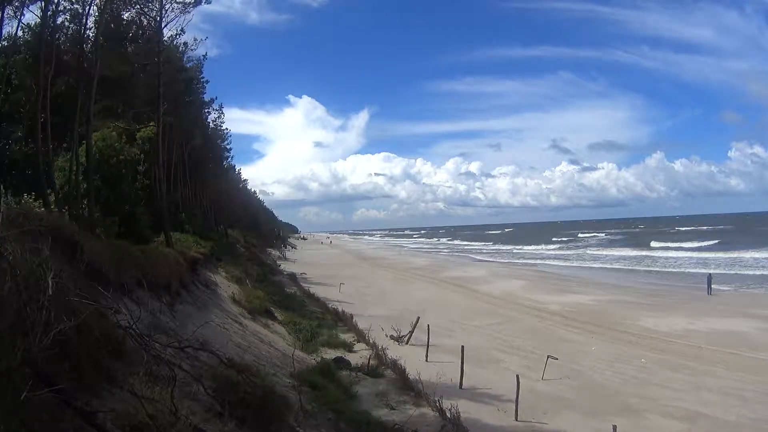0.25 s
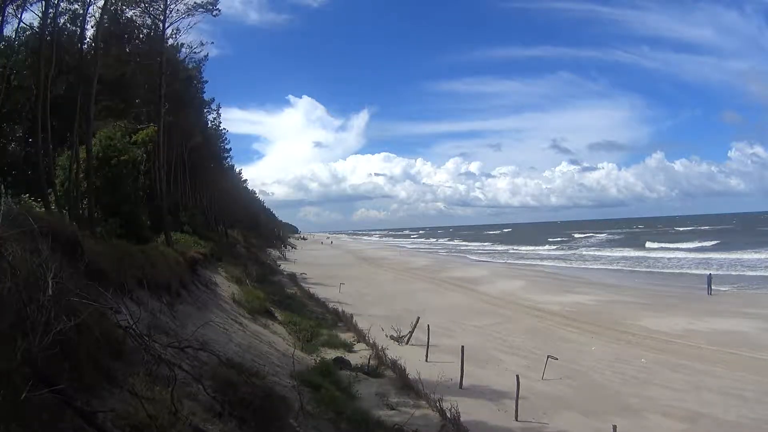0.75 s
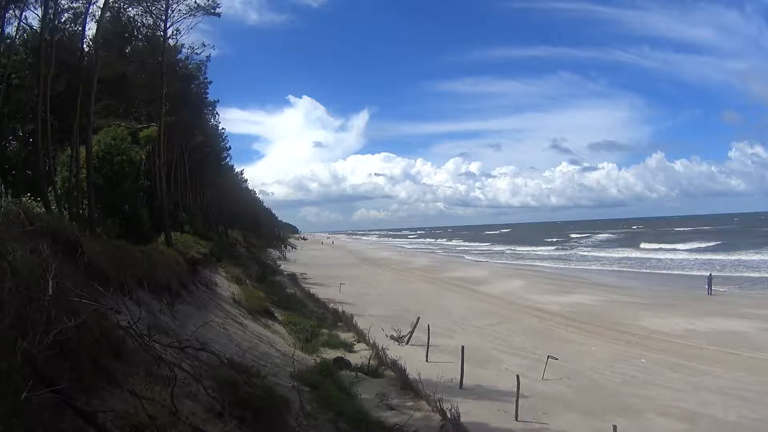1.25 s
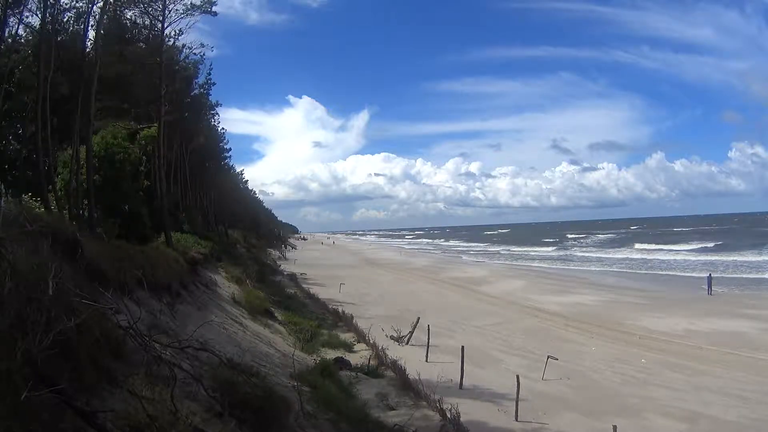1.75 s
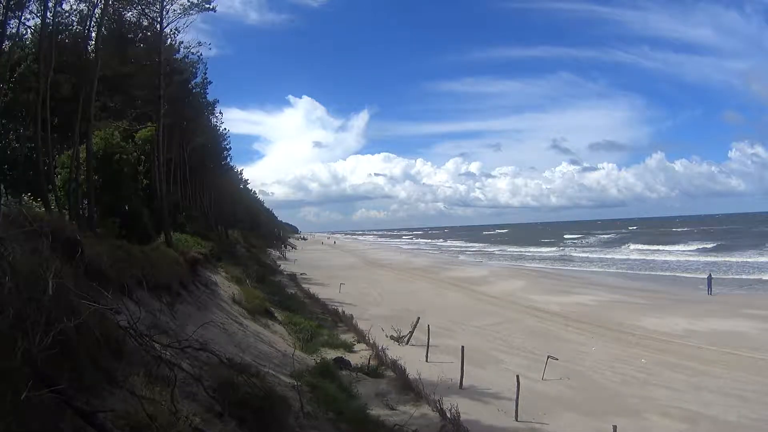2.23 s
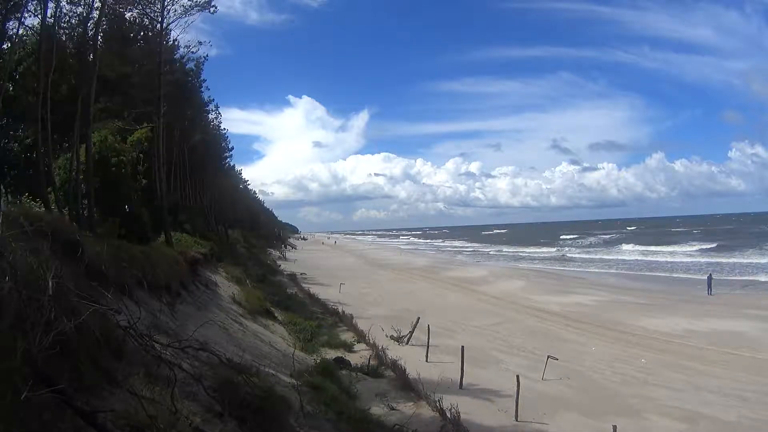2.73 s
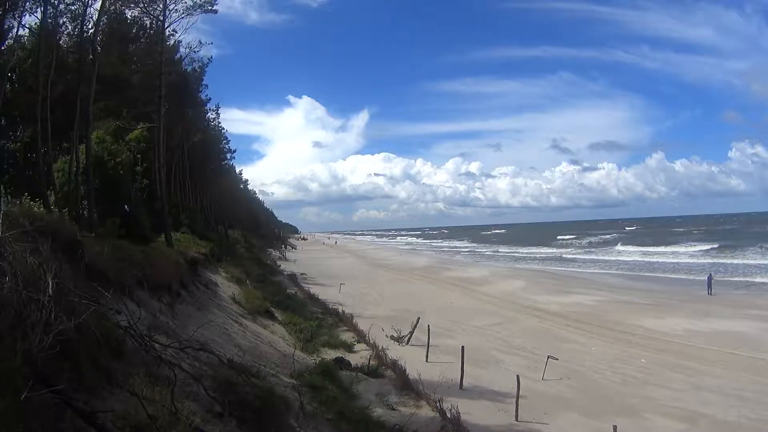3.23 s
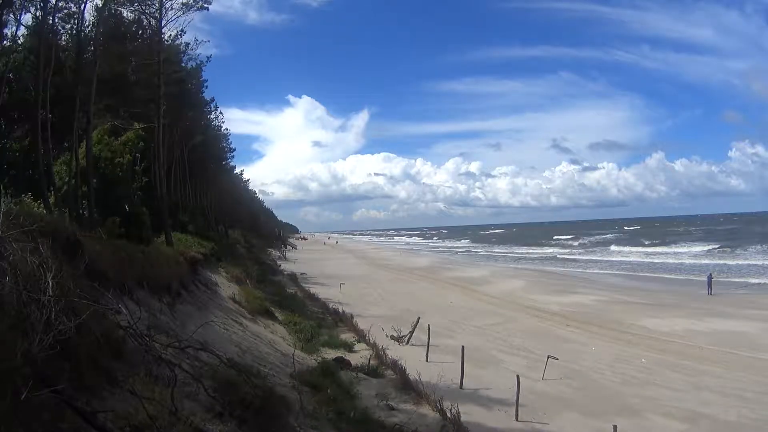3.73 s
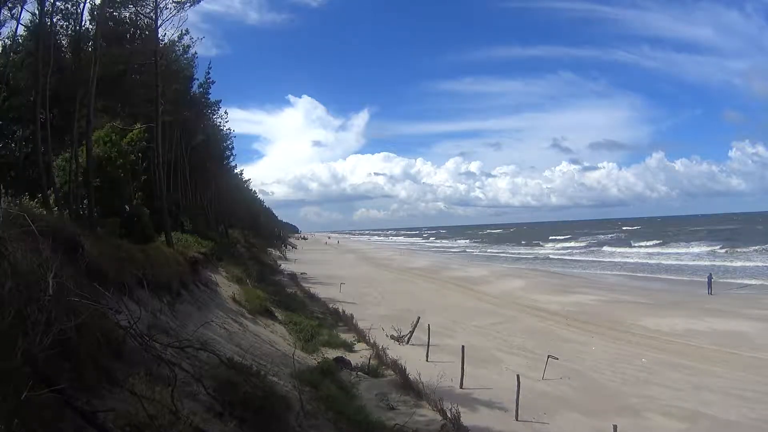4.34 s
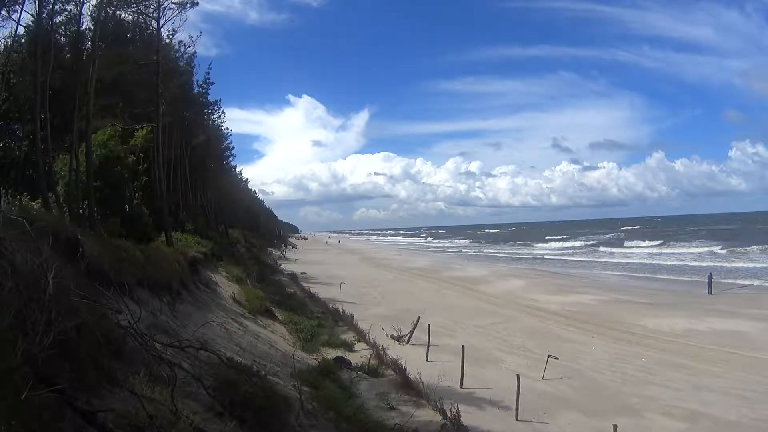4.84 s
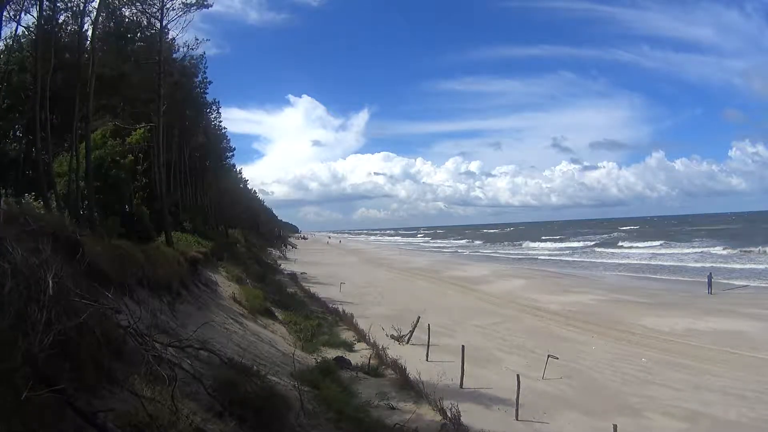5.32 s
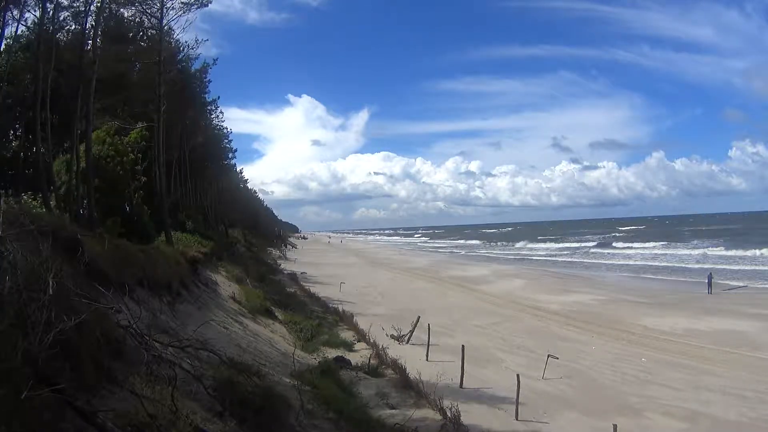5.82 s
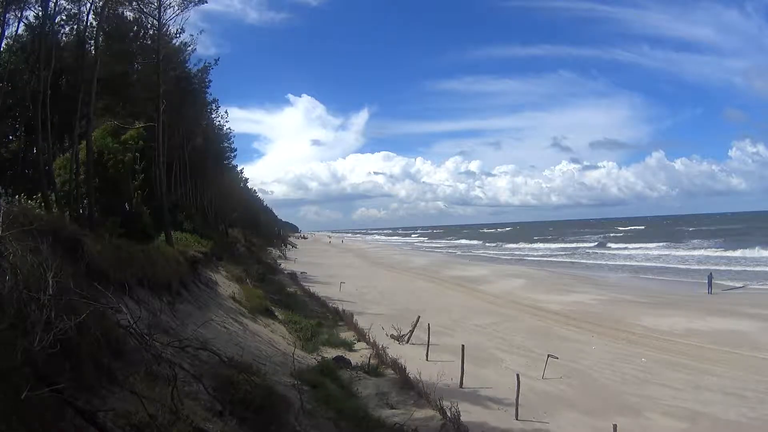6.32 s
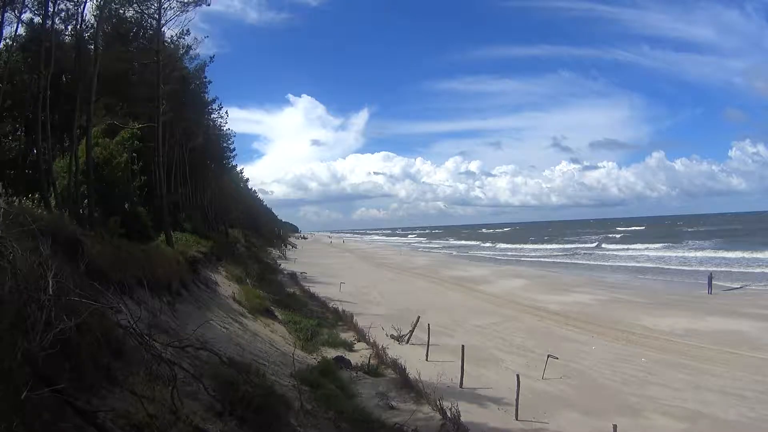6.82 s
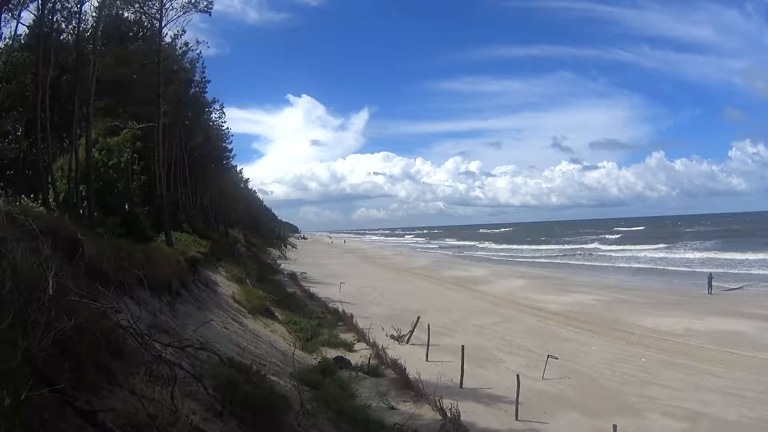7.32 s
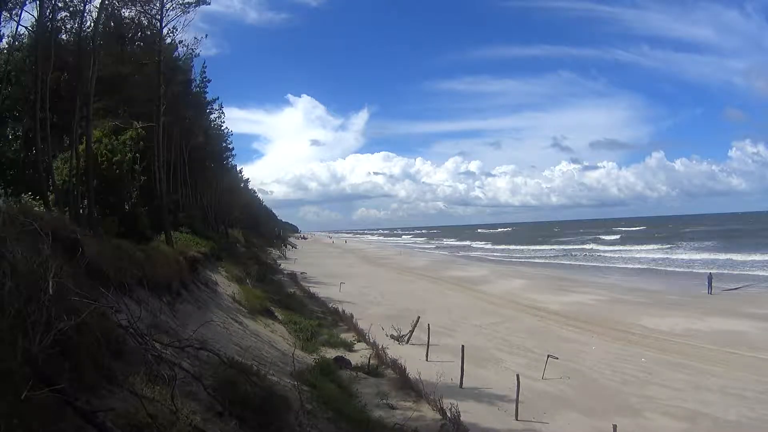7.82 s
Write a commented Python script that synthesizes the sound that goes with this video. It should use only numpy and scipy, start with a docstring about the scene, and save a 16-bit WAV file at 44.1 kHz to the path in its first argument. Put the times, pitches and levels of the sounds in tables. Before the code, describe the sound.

Buffeting wind rumbles and rushes with faint breathy whistling, a few sand grains tick close by, and far breakers hiss continuously behind.

```python
"""Wind on a dune above a sandy beach, heard by the two microphone ports of a small camera facing the sea.
From start to end distant surf roars and hisses: shaped noise that lifts a little in slow swells.
Puffs of wind come thick in the first five seconds: slowly swelling noise thumps, flutters, rushes and rings.
Between about 1.5 and 2.8 s sand grains tick on the case as short, ringing taps; near 2.5 s the wind peaks.
After 5 s the puffs are sparser, and the last one comes right at the end."""
import sys
import numpy as np
from scipy import signal
from scipy.fft import rfft, irfft
from scipy.io import wavfile
from scipy.ndimage import uniform_filter1d

SR = 44100
rng = np.random.default_rng(int(sys.argv[2]) if len(sys.argv) > 2 else 0)


def master_out(mix):
    """Clip the mix to full scale and print it as 16-bit PCM to the path in sys.argv[1]."""
    frames = np.transpose(np.atleast_2d(mix))
    ceiling = np.clip(frames, -1, 1)
    pcm = np.round(ceiling * 32767).astype(np.int16)
    wavfile.write(sys.argv[1], SR, pcm)


N = 355600


def undb(db):
    """Turn decibels into a gain to multiply with."""
    return 10 ** (np.asarray(db) / 20)


def unit(x):
    """Scale a sound so that its average strength (rms) is 1."""
    return x / np.sqrt(np.mean(x ** 2))


def bins():
    """Frequencies in Hz of a full-length spectrum, with 0 raised to 1 so that logarithms work."""
    return np.maximum(np.fft.rfftfreq(N, 1 / SR), 1)


def across(hz, values):
    """Join values by straight lines over pitch, that is, over the logarithm of frequency."""
    return np.interp(np.log(bins()), np.log(hz), values)


def colour(points):
    """Gain at each frequency, from points of frequency and relative level in dB."""
    hz, db = np.transpose(points)
    return undb(across(hz, db))


def curve(table):
    """Draw a table of times and values as a line, sample by sample."""
    return np.interp(np.arange(N) / SR, *np.transpose(table))


def swell(crest_s, rise_s, fall_s):
    """A bell that reaches 1 at the crest; rise and fall are the times from 1/e to 1 and back."""
    age = np.arange(N) / SR - crest_s
    return np.exp(-(age / np.where(age < 0, rise_s, fall_s)) ** 2)


def walk(rate):
    """A smooth random wander of rms 1: noise with the changes faster than about rate in Hz faded out."""
    smoothing = np.exp(-(bins() / rate) ** 2)
    return unit(irfft(rfft(rng.standard_normal(N)) * smoothing, N))


def ports(gain):
    """Noise of a given colour as two ports hear it: partly shared, shifted in phase, unequal in level."""
    # how the two ports hear the same air:
    # f/Hz, left minus right/dB, likeness (0 to 1), lead of the left/rad
    port_table = [(100, 0.2, 1.0, 0.0), (400, 1.0, 0.88, 0.1), (680, 2.4, 0.6, 0.3), (950, 3.6, 0.71, 3.0),
                  (1080, -0.7, 0.74, 3.0), (1380, 0.5, 0.76, 0.3), (1780, 5.0, 0.87, 0.3),
                  (1950, 9.4, 0.48, -1.6), (2150, 4.9, 0.79, -2.4), (2550, 1.8, 0.85, -2.3),
                  (3100, 0.8, 0.85, -1.5), (3900, -0.3, 0.21, 2.4), (5000, -4.0, 0.57, -1.2),
                  (6700, 0.1, 0.77, -1.0), (7800, 1.6, 0.28, -2.1), (10300, 2.2, 0.59, 0.1)]
    hz, tilt_db, likeness, lead = np.transpose(port_table)
    shared = across(hz, likeness * np.exp(1j * lead))
    right, own = rfft(rng.standard_normal((2, N)))
    # the left gets the shared part, filled up with noise of its own
    left = shared * right + np.sqrt(np.maximum(1 - abs(shared) ** 2, 0)) * own
    tilt = undb(across(hz, tilt_db))
    both = np.array([left * tilt, right])
    return unit(irfft(both * gain / np.hypot(1, tilt), N))


def sea():
    """Rise in dB of roar and foam hiss: each swell builds quickly and sinks a little more slowly."""
    # waves along the shore; the roar rise at 2.42 s is probably the strong gust's rush:
    # crest t/s, roar rise/dB, foam hiss rise/dB
    swells = [(.35, 2.2, 1), (1.0, 1.5, 1), (1.7, 2, 1), (2.42, 3, 2.5), (4.38, 1.3, 3.5), (5.0, 1, 2),
              (5.75, 1.6, 3.5), (6.75, 0.5, 2), (7.35, 0.6, 1.2), (7.95, 0.5, 2)]
    roar_db = hiss_db = 0
    for crest_s, roar, foam in swells:
        bell = swell(crest_s, rise_s=0.28, fall_s=0.38)
        roar_db = roar_db + roar * bell
        hiss_db = hiss_db + foam * bell
    return roar_db, hiss_db


def surf(roar_db):
    """Many far breakers merge into one roar: three noises, as stretches of shore, swell on their own."""
    # colour of the surf: f/Hz, relative level/dB
    surf_colour = [(40, -0.5), (500, -8), (820, -8), (1000, -3.5), (1230, -6.5), (1480, -1), (1900, 0),
                   (2250, -17), (3150, -7.5), (3700, -20), (5200, -22.5), (8000, -38)]
    shore = 0
    for _ in range(3):
        stretch_db = 0.84 * walk(8.5) + 1.0 * walk(18)
        shore = shore + ports(colour(surf_colour)) * undb(stretch_db)
    return unit(shore) * undb(-41.5 + roar_db)


def hiss(hiss_db):
    """Foam running up the sand: treble noise that wavers only slightly, so it sounds smooth and distant."""
    # colour of the foam: f/Hz, relative level/dB
    hiss_colour = [(2000, -20), (4200, 2), (5300, 0), (6300, 4.5), (6800, 2), (7600, -7), (8600, -12),
                   (9900, -25.5), (10900, -8)]
    return ports(colour(hiss_colour)) * undb(-55 + hiss_db + 0.6 * walk(12))


def sand():
    """Each grain taps the case and skitters off as fading noise; the case rings briefly with each push."""
    # sand grains: t/s, level of the first tap/dB, fading time of the skitter/ms
    grains = [(1.531, -30, 1.5), (1.673, -26, 2.5), (2.4924, -19, .8), (2.4932, -10.5, .9),
              (2.6323, -28, 1.5), (2.6395, -26, 3.5), (2.6516, -17.5, .7), (2.6527, -19.5, 1),
              (2.6615, -26, 3), (2.7348, -25, 1.2), (2.7403, -17.5, 1), (2.7545, -26, 1.2)]
    # colour of the case's ring: f/Hz, relative level/dB
    grain_colour = [(100, -40), (600, -10), (1050, 0), (1800, 0), (3000, 3), (4300, -3), (5500, -14),
                    (7000, -24), (11000, -45)]
    taps = np.zeros(N)
    age_ms = 1000 * np.arange(SR // 50) / SR
    for s, db, skitter_ms in grains:
        push = 0.26 * rng.standard_normal(len(age_ms)) * np.exp(-age_ms / skitter_ms)
        push[0] = 1
        start = int(s * SR)
        taps[start:start + len(push)] += undb(db) * push
    # folding the cepstrum forward makes the ring start sharply, with nothing ahead of the tap
    cepstrum = irfft(np.log(colour(grain_colour)), N)
    cepstrum[1:N // 2] *= 2
    cepstrum[N // 2:] = 0
    case = np.exp(rfft(cepstrum))
    ring_peak = np.max(abs(irfft(case, N)))
    ticks = irfft(rfft(taps) * case, N) / ring_peak
    # the right port hears the ticks 0.16 ms later and 5 dB softer
    right = undb(-5) * np.roll(ticks, int(0.00016 * SR))
    return np.array([ticks, right])


def wind():
    """Levels in dB of big eddies, fine eddies and flow through the slots: puffs ride on the slow wind."""
    # slow wind, as the level of its rumble before trims: t/s, level/dB
    wind_table = [(0.0, -34), (0.2, -30), (0.42, -34), (0.95, -37.5), (1.42, -35), (1.68, -25), (1.89, -35),
                  (2.05, -29.0), (2.55, -23.5), (2.9, -38.5), (3.3, -33), (4.9, -35.5), (5.7, -31.5),
                  (6.0, -39), (6.35, -30.0), (6.85, -38.5), (7.7, -40.5), (8.06, -37)]
    # air speed across the slots; only its swings about the mean count, scaled below: t/s, level/dB
    air_table = [(0.0, -50.5), (0.22, -43.5), (0.38, -49), (0.98, -43.0), (1.43, -49.5), (1.62, -43),
                 (1.87, -48.5), (2.5, -37), (2.88, -47.5), (3.15, -44.5), (3.7, -49.5), (4.47, -42),
                 (4.75, -43.5), (5.04, -43), (6.1, -47.5), (6.4, -47), (6.8, -48.5), (8.06, -48.5)]
    # puffs that hit the microphone: t/s, length between 1/e points/s, thump rise/dB, flutter rise/dB
    puffs = [(0.183, 0.13, 2.5, 0), (0.516, .06, 5.5, 3.5), (.73, 0.14, 8.5, 6.5), (0.889, 0.084, 5.5, 9.5),
             (1.001, 0.17, 9, 10), (1.165, 0.096, 7, 5.5), (1.309, 0.097, 11.5, 7), (1.73, 0.064, 4, 3),
             (1.982, .06, 5, 5.5), (2.105, .06, 7, 3.5), (2.776, 0.25, 5, 1.5), (3.016, 0.18, 10, 5.5),
             (3.164, .11, 5, 4), (3.337, .12, 6, 5), (3.632, 0.13, 6.5, 3.5), (4.032, 0.062, 3.5, 4.5),
             (4.168, 0.085, 7, 5.5), (4.443, 0.13, 7, 5), (5.064, .08, 7, 3), (6.313, 0.073, 3.5, 1),
             (6.46, 0.057, 4.5, 0.5), (7.197, .17, 6.5, 0.5), (7.422, .13, 6.5, 0), (8.023, 0.061, 11, 4)]
    wind_db, air_db = curve(wind_table), curve(air_table)
    thump_db = flutter_db = 0
    for s, length_s, thump, flutter in puffs:
        puff = swell(s, length_s / 2, length_s / 2)
        thump_db = thump_db + thump * puff
        flutter_db = flutter_db + flutter * puff
    jostle_db = 1.4 * walk(8)  # small chance swells on top of the puffs
    big_db = wind_db + thump_db + jostle_db
    # fine eddies grow with the wind, by 0.8226 dB per dB
    wind_swing_db = wind_db - np.mean(wind_db) + jostle_db
    fine_db = -42.5 + 0.8226 * wind_swing_db + flutter_db
    # the flow through the slots follows the air speed, and the puffs only weakly
    gust_db = 0.5957 * (air_db - np.mean(air_db)) + 0.17 * flutter_db
    gust_db = gust_db + 0.72 * walk(7.5) + 0.2 * jostle_db
    return big_db, fine_db, gust_db


def slots(gust_db):
    """Air blown across the slots rings them breathily: narrow bands of noise, each flickering on its own."""
    # air resonances of the slots: f/Hz, width/Hz, level before a common 5 dB cut/dB
    resonances = [(2430, 110, -51), (2545, 95, -46.5), (2870, 130, -51.5), (3060, 150, -48.7),
                  (4010, 170, -63)]
    out = 0
    for hz, width_hz, db in resonances:
        ring = ports(1 / (1 + ((bins() - hz) / (width_hz / 2)) ** 2))
        flicker_db = 1.5 * walk(8) + 2.4 * walk(35)
        out = out + ring * undb(db - 5.0 + 2.11 * gust_db + flicker_db)
    return out


def rush(gust_db, tumble):
    """Broad rush of air round the case: noise that follows the flow and shakes with the fine eddies."""
    # colour of the rush: f/Hz, relative level/dB
    rush_colour = [(300, -7), (700, -15.5), (1020, -1), (1300, -7), (1600, -2.5), (2020, 3), (2250, 0.5),
                   (2700, -6.5), (3200, -7.5), (3800, -11.5), (4500, -22), (10000, -59)]
    level_db = -44.5 + 1.0 * gust_db + 1.0 * tumble + 0.66 * walk(30)
    return ports(colour(rush_colour)) * undb(level_db)


def tearing(fine_db):
    """Flow tears off the edges of the case in a rough, fluttering rasp, strongest in the hardest gusts."""
    # colour of the rasp: f/Hz, relative level/dB
    tearing_colour = [(150, -5), (350, 2), (650, -2.5), (1050, 1.5), (1300, -13.5), (1750, 4), (2300, 5),
                      (3100, -12), (4500, -30), (10000, -48)]
    excess_db = fine_db - np.mean(fine_db)
    return ports(colour(tearing_colour)) * undb(-54.5 + 1.2 * excess_db + 1.5 * walk(84))


def eddies(points, evenness, span_s):
    """Noise as turbulent pressure, its own swells partly levelled so that the gusts set the loudness."""
    x = irfft(rfft(rng.standard_normal(N)) * colour(points), N)
    power = uniform_filter1d(x ** 2, int(span_s * SR))
    return unit(x / power ** (evenness / 2))  # evenness 0: untouched, 1: fully levelled


def buffeting(big_db, fine_db, tumble):
    """Slow eddies rumble, big ones thump, fine ones flutter; nearly alike in both ports."""
    # colours of the slow, big and fine eddies: f/Hz, relative level/dB
    slow_points = [(10, -6), (22, 10), (32, 14), (42, 14.5), (58, 19.5), (66, 12), (76, 6), (100, 1),
                   (150, -54)]
    big_points = [(40, -14), (62, 0.5), (82, 2), (112, -2), (133, -7), (150, -18.5), (220, -77)]
    fine_points = [(120, -26), (148, -8), (160, -0.5), (190, 3.5), (235, -2.5), (280, -7), (420, -12),
                   (600, -24.5), (1200, -36), (9000, -90)]
    # stronger wind sheds its eddies faster, so the weight moves up in pitch
    shift_db = 0.2 * (big_db - np.mean(big_db))
    slow = eddies(slow_points, evenness=0.75, span_s=0.19) * undb(big_db - shift_db - 6.0)
    big = eddies(big_points, evenness=0.81, span_s=0.13) * undb(big_db + shift_db - 6.0)
    fine = eddies(fine_points, evenness=0.42, span_s=0.11) * undb(fine_db + 1.33 * tumble - 4.0)
    # the finer the eddy, the more it differs from port to port
    apart = eddies(big_points, evenness=0.5, span_s=0.084) * undb(big_db - 38.5)
    apart = apart + eddies(fine_points, evenness=0.38, span_s=0.1) * undb(fine_db - 24.5)
    sides = np.array([[1], [-1]])  # left, right
    lean_db = 0.3  # left louder than right
    return (slow + big + fine) * undb(sides * lean_db / 2) + sides * apart


def scene():
    """Sea, sand and wind together; one turbulence shakes both the low flutter and the rush."""
    roar_db, hiss_db = sea()
    big_db, fine_db, gust_db = wind()
    tumble = walk(36)
    background = surf(roar_db) + hiss(hiss_db)
    air = slots(gust_db) + rush(gust_db, tumble) + tearing(fine_db)
    return background + sand() + air + buffeting(big_db, fine_db, tumble)


def record(dry):
    """Steep low-pass: nothing is heard above about 10880 Hz."""
    top_cut = signal.ellip(12, 0.1, 80, 10880, fs=SR, output="sos")
    return signal.sosfilt(top_cut, dry)


dry = scene()
out = record(dry)
master_out(out)
```